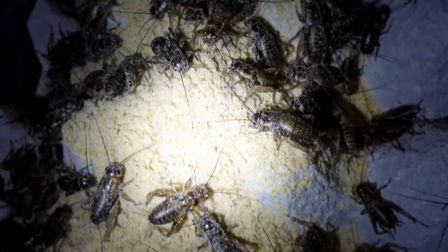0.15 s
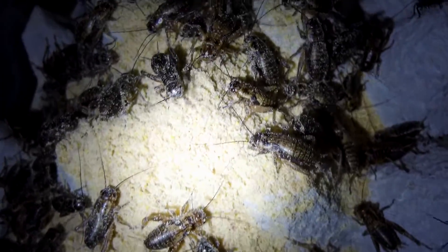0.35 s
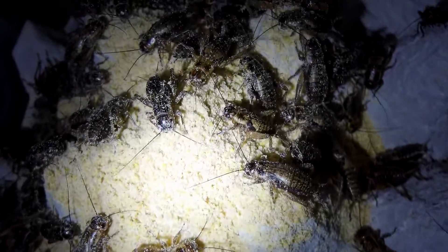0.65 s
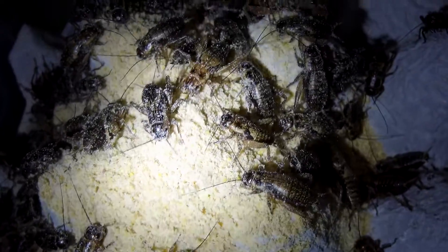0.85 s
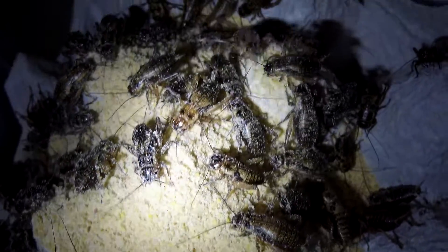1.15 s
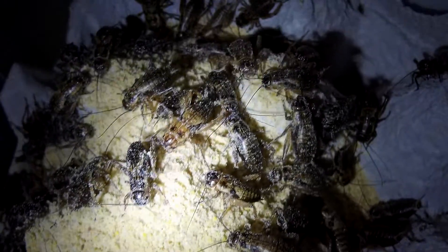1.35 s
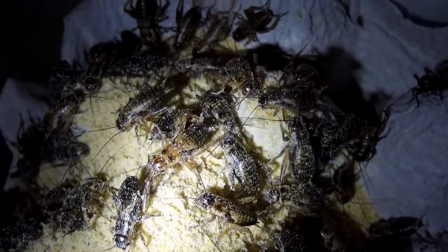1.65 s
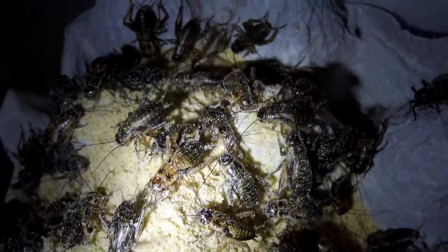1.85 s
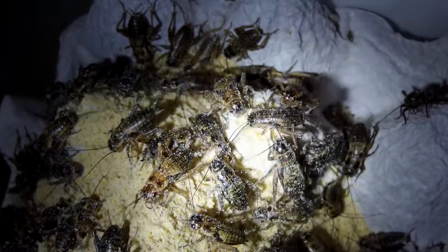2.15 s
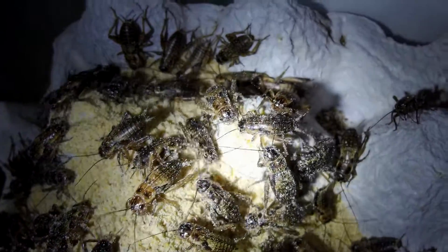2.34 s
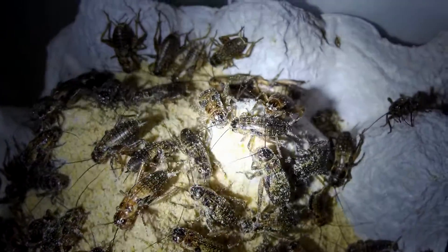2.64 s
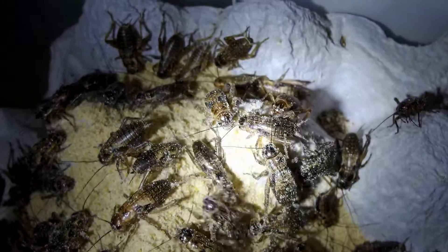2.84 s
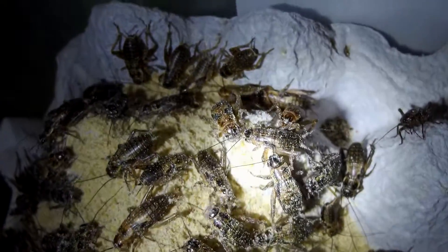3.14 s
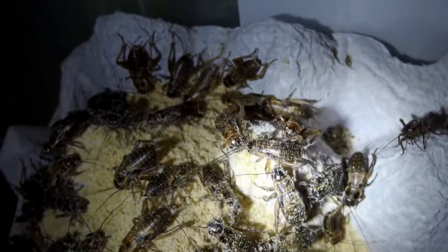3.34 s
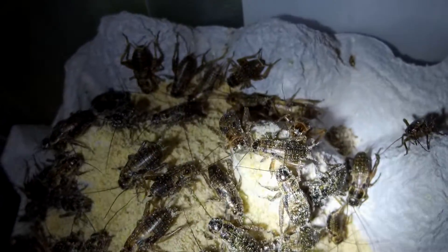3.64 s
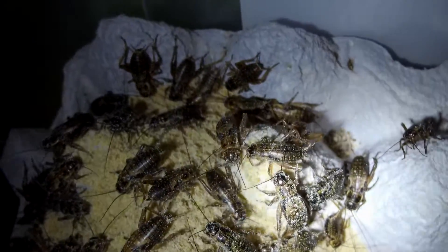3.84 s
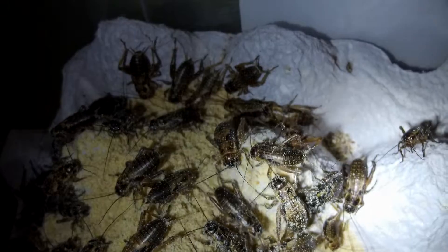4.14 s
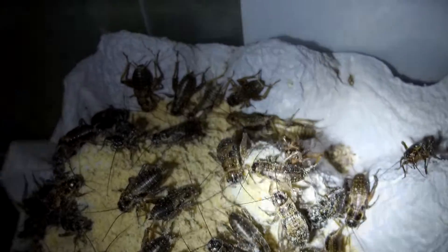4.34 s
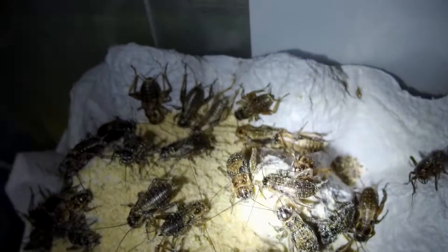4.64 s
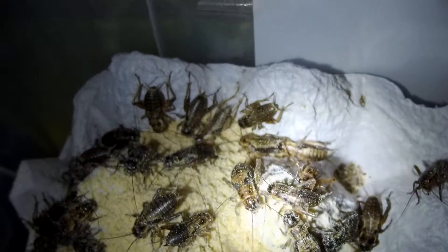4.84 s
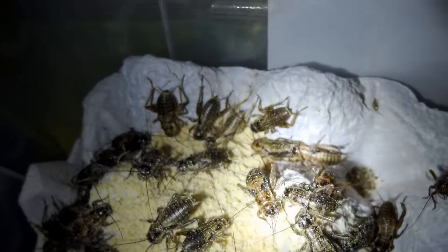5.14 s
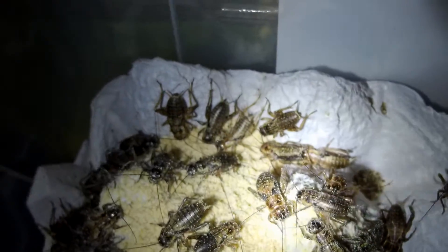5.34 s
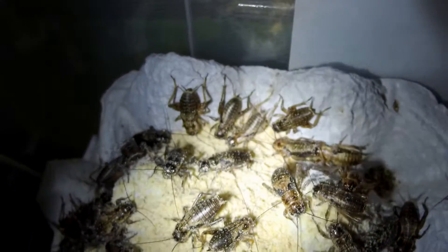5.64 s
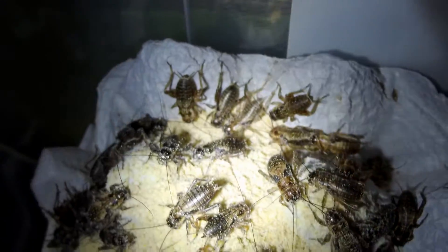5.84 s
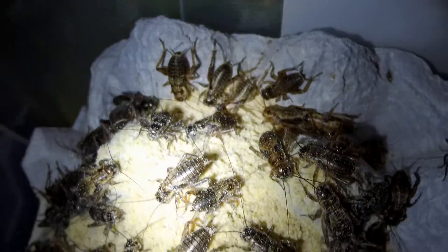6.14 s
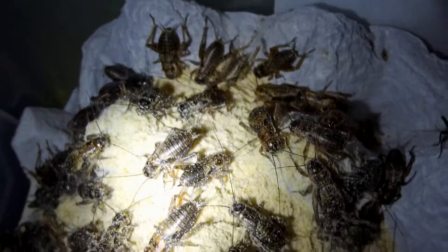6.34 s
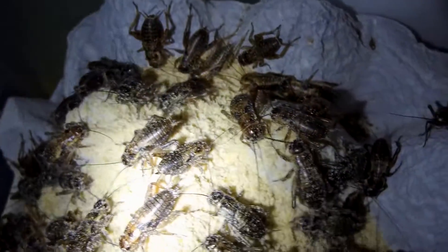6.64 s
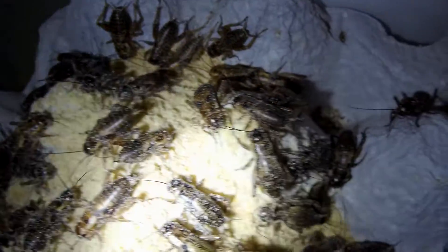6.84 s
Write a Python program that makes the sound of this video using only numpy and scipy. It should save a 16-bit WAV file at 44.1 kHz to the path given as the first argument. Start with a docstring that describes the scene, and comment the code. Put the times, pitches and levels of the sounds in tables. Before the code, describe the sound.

Dry, tiny ticks and scuffles of crawling, feeding crickets over a low steady hum, with one hollow knock and finger handling noise up close.

```python
"""Indoors, beside a tub: crickets crawl and feed on crumbs a hand's breadth from a hand-held camera.
Legs and jaws tick and scuffle as shaped noise bursts; mains hum, whine and a whistle are sines;
room air and microphone hiss are coloured noise. Something hollow is knocked once (struck modes),
and fingers shake the microphone, tap the casing (noise bursts) and rub it (stick-slip pulses)."""
import sys
import numpy as np
from scipy import signal
from scipy.fft import rfft, irfft
from scipy.io import wavfile
from scipy.ndimage import uniform_filter1d

SR = 44100
rng = np.random.default_rng(int(sys.argv[2]) if len(sys.argv) > 2 else 0)


def transcribe(u):
    """Save the signal u as a 16-bit wav file named by the first command-line argument.

    u: samples, shape (n,) or (channels, n), limited to [-1, 1]; the rate is SR.
    q: integer samples, one column per channel.
    """
    v = np.clip(np.atleast_2d(u).T, -1, 1)
    q = np.round(v * 32767).astype(np.int16)
    wavfile.write(sys.argv[1], SR, q)


N = 308259
T = np.arange(N) / SR

# mains hum: (frequency [Hz], mean level [dB rms])
HUM = [(120, -44.5), (240, -59.5)]
# electric whine with mains sidebands: (frequency [Hz], mean level [dB rms])
WHINE = [(12168, -83), (12228, -77), (12288, -83)]
# colour of room air and hiss: (frequency [Hz], relative density [dB per Hz])
AIR_COLOUR = [(35, -28), (60, -15), (98, -10), (123, -3), (145, -5.5), (170, -5), (241, -7.5), (311, -12.5),
              (410, -16.5), (580, -21), (966, -24), (1220, -26.5), (6450, -35.5), (12100, -33),
              (15200, -37.5)]
# resonances of the air: (centre [Hz], width [Hz], level [dB rms])
AIR_RESONANCES = [(81.6, 18, -59), (146.2, 8.1, -62), (239, 50, -57), (600, 156, -58)]
# rumble as the hand shakes the microphone: (time [s], level before jolts [dB rms])
SHAKE = [(0.0, -67), (0.6, -53), (0.8, -61), (2.14, -61), (2.22, -49), (2.32, -61), (3.19, -57),
         (3.27, -48), (3.36, -56), (3.43, -44.5), (3.54, -43), (3.62, -58), (4.7, -53), (5.14, -46.5),
         (5.28, -55), (5.64, -52), (5.71, -45), (6.15, -62), (6.44, -50), (6.6, -61), (6.99, -58)]
# bodies scuffling over crumbs: (time [s], length [s], level [dB rms], centre [Hz], width [Hz])
SCUFFLES = [(0, 0.098, -58.5, 9400, 11000), (0.302, 0.021, -60, 4000, 2500),
            (0.339, 0.053, -60, 9000, 9000), (0.534, .03, -63, 7000, 8050), (0.655, 0.031, -53, 5900, 9000),
            (1.885, .05, -61, 10000, 8000), (2.868, 0.036, -57, 9000, 9000),
            (3.09, 0.17, -65.5, 3900, 1800), (3.794, 0.17, -65.5, 4000, 4000),
            (5.797, 0.048, -49.5, 2380, 4140), (6.027, .1, -66, 4800, 1600),
            (6.549, 0.088, -56.5, 7850, 9000), (6.836, 0.21, -63, 12200, 5000)]
# fainter feet: (centre [Hz], mean rate [steps/s], level [dB rms])
PATTER = [(3360.0, 31, -68.5), (6160.0, 81, -71), (11900.0, 60, -64)]
# short faint rising pips, perhaps a far cricket: (time [s], level [dB], mid pitch [Hz])
PIPS = [(0.174, -54, 2430), (.783, -56, 2570), (1.267, -51, 2580), (3.73, -54.5, 2700), (4.228, -60, 2620),
        (6.202, -58, 2640), (6.713, -55.5, 2690)]
# clearest ticks of legs and jaws: (time [s], peak level [dB], centre [Hz])
TICKS = [(0.178, -42, 4530), (0.431, -44, 4000), (0.5936, -35, 13700), (0.622, -44, 4590),
         (0.658, -42, 4730), (0.706, -39, 12200), (0.813, -38, 11500), (0.839, -43, 4620),
         (0.9468, -35, 11600), (0.9957, -38, 12900), (1.073, -41, 11100), (1.107, -29, 14000),
         (1.238, -35.5, 12300), (1.4003, -37, 12000), (1.485, -43, 5020), (1.6497, -33.5, 12200),
         (1.69, -35, 10000), (2.113, -32, 14000), (2.1642, -39, 5800), (2.2568, -36.5, 7340),
         (2.399, -38.5, 3770), (2.4868, -44, 4670), (2.543, -32.5, 11000), (2.562, -36, 3780),
         (2.589, -30, 13300), (2.881, -32.5, 8800), (3.02, -40, 11600), (3.0505, -35, 14100),
         (3.2947, -30.5, 3900), (3.2955, -33, 9500), (3.4466, -40, 14600), (3.616, -34.5, 11900),
         (3.7484, -42, 8980), (3.8352, -37, 13200), (4.143, -41, 5590), (4.2199, -35, 12200),
         (4.3248, -42, 4600), (4.325, -38, 11100), (4.4435, -33, 11400), (4.61, -35, 13300),
         (4.78, -37, 11800), (4.897, -35, 13700), (4.9668, -33.5, 10300), (5.2281, -41, 12800),
         (5.5426, -35, 12200), (5.6925, -41, 12100), (5.751, -34, 12200), (5.7983, -32, 3240),
         (5.863, -43, 5500), (6.01, -47, 3200), (6.1629, -38.5, 4500), (6.1824, -36, 11000),
         (6.4937, -36, 13400), (6.5511, -40, 11500), (6.69, -38, 14000), (6.799, -32, 12100),
         (6.8349, -41, 6480), (6.8863, -31.5, 11900)]
# blows on the hollow thing: (time [s], strength [dB], contact [s], place [0 rim to 1 middle])
KNOCKS = [(.304, -18.5, 0.00051, .05), (.308, -33, 0.00068, .05), (.316, -18.5, 0.00033, 1),
          (0.329, -29, 0.0004, 0.5)]
# its modes: (frequency [Hz], level struck at rim [dB], level struck in middle [dB], t60 [s])
HOLLOW_MODES = [(139.2, -15, -7.5, 0.25), (309, -2, -9, 0.12), (497, -14, -33, 0.05), (626, -15, 0, 0.12),
                (641, -14, -2.5, 0.21), (880, -19, -25, 0.081), (1107, -8.5, -16, 0.078),
                (1292, -9, -25, 0.086), (1875, -27, -22, 0.1), (2308, -14, -25, 0.11),
                (2970, -28, -24.5, .07)]
# the room's answer to a blow: (centre [Hz], width [Hz], relative level [dB], t60 [s])
ECHO = [(194, 230, -12.5, 0.28), (627, 250, -15.5, 0.26), (1150, 450, -22.5, 0.23), (2270, 800, -27, 0.17),
        (3900, 2200, -42, 0.071)]
# taps on the casing: (time [s], peak level before last band-pass [dB], centre [Hz], t60 [s])
TAPS = [(0.475, -30.5, 1090, 0.024), (0.52, -41, 600, .03), (0.563, -35, 595, 0.041),
        (2.167, -41.5, 900, 0.026), (2.446, -37, 460, 0.048), (2.603, -39, 1800, 0.012),
        (3.294, -43, 890, 0.033), (3.812, -40, 1280, 0.05), (4.037, -37.5, 1300, 0.017),
        (4.042, -21, 770, 0.015), (4.136, -35, 1480, 0.025), (4.143, -26, 700, 0.042),
        (4.192, -40.5, 860, 0.064), (4.325, -32.5, 1080, 0.021), (4.513, -34, 590, 0.015),
        (5.382, -43, 1160, 0.076), (5.669, -30.5, 590, 0.034), (5.797, -30.5, 1310, 0.036),
        (5.802, -31.5, 694, 0.082), (5.818, -43.5, 2300, 0.12), (6.377, -38, 690, 0.039)]
# finger strokes along the casing: (start [s], rise [s], hold [s], level [dB])
RUBS = [(3.77, 0.027, 0.019, -48.5), (3.89, .03, 0.099, -54), (4.162, .02, 0.033, -51),
        (4.484, .04, 0.037, -45), (5.183, 0.032, .055, -55), (5.906, 0.025, .025, -47.5),
        (6.015, 0.038, 0.021, -39.5), (6.094, .005, 0.027, -39.5), (6.145, 0.023, 0.019, -48),
        (6.839, .003, 0.041, -32.5), (6.891, 0.0033, 0.044, -31.5)]
# casing resonances: (centre [Hz], width [Hz], relative level [dB])
CASING = [(429, 255, 2.5), (593, 270, -10), (270, 105, -16), (1170, 370, -13.5)]

AIR_DB = -48
WHISTLE_HZ, WHISTLE_SAG_HZ_PER_S = 14050., 70.
WHISTLE_FAINT_DB, WHISTLE_SWOLLEN_DB = -80, -70  # per strand, before wavering
WHISTLE_SWELLS_S, WHISTLE_RISE_S = 4.4, .45
SHAKE_JOLT_DB = 2.5
GRIT_DB = 4.5  # spread of grain sizes in a scuffle
STEP_DECAY_S = 0.0047  # to 1/e
PIP_S, PIP_RISE_PER_S = .035, 2.4  # rise as share of mid pitch
TICK_T60_S = 0.011
TICK_WIDTH_HZ, TICK_WIDTH_SHARE = 3200, 0.51  # width = first + share of centre
TAP_RISE_SHARE = 0.095  # of t60
TAP_SHARP_CYCLES = 18  # cycles in t60 at which width = centre; longer rings are narrower
TAP_SNAP = 2  # first clean contact against the noise that follows
SLIP_HZ = 131.2  # typical stick-slip rate of skin on plastic
RUB_RELEASE_S = .014
TOP_HZ = 15230


def undb(db):
    """Amplitude from dB."""
    return 10 ** (np.asarray(db) / 20)


def level(x, rms_db):
    """Scales x to an rms level."""
    return x * undb(rms_db) / np.sqrt(np.mean(x ** 2))


def noise(count=N):
    """White noise of unit spread."""
    return rng.standard_normal(count)


def band(x, hz, width_hz):
    """Two-pole-pair band-pass around hz."""
    low_hz = np.sqrt(hz ** 2 + width_hz ** 2 / 4) - width_hz / 2
    high_hz = min(low_hz + width_hz, .45 * SR)
    sos = signal.butter(2, [low_hz, high_hz], "bandpass", fs=SR, output="sos")
    return signal.sosfilt(sos, x)


def walk(rate_hz):
    """Random levels held 1 / rate_hz and slewed twice; spread near 1."""
    hold = int(SR / rate_hz)
    steps = np.repeat(noise(N // hold + 1), hold)
    slewed = uniform_filter1d(uniform_filter1d(steps, hold), hold)
    return 0.69 * slewed[:N]


def add(out, time_s, x):
    """Mixes x into out from time_s."""
    start = int(time_s * SR)
    out[start:start + len(x)] += x[:N - start]


def burst(peak_db, hz, width_hz, t60_s, rise_s=0.0002, linger_db=-20, snap=0.):
    """Noise coloured round hz: quick rise, optional contact spike, fall in t60, faint longer tail."""
    t = T[:4096]
    fall = 1000. ** (-t / max(t60_s, .001)) + undb(linger_db) * 1000. ** (-t / 0.066)
    spike = np.arange(len(t)) == int(rise_s * SR)
    shove = noise(len(t)) - snap * np.sqrt(SR / hz) * spike
    rise = np.minimum(t / max(rise_s, 1e-4), 1)
    x = band(shove * rise * fall, hz, width_hz)
    return x * undb(peak_db) / np.abs(x).max()


def hum_and_whine():
    """Steady sines at random phase, each wavering by about 1 dB."""
    out = np.zeros(N)
    for hz, db in [*HUM, *WHINE]:
        sine = np.sin(2 * np.pi * (hz * T + rng.random()))
        out += np.sqrt(2) * undb(db + 1.0 * walk(8)) * sine
    return out


def air():
    """Coloured noise that swells a little in each half octave, plus noise in the air's resonances."""
    hz, db = np.transpose(AIR_COLOUR)
    f = np.maximum(np.arange(N // 2 + 1) * SR / N, 1)
    colour = undb(np.interp(np.log(f), np.log(hz), db, -80, db[-2]))
    out, swell = np.zeros(N), walk(2.0)
    for centre in np.arange(6, 14.6, .5):  # log2 Hz
        window = np.cos(np.pi * np.clip(np.log2(f) - centre, -.5, .5))
        slice_noise = irfft(rfft(noise()) * colour * window, N)
        out += undb(0.12 * swell + 2.14 * walk(12)) * slice_noise
    out = level(out, AIR_DB)
    for centre_hz, width_hz, rms_db in AIR_RESONANCES:
        out += level(band(noise(), centre_hz, width_hz), rms_db)
    return out


def whistle():
    """Hazy high whistle, faint then swelling and sagging: strands wander apart and blur into a band."""
    out = np.zeros(N)
    swell_s = [WHISTLE_SWELLS_S, WHISTLE_SWELLS_S + WHISTLE_RISE_S]
    db = np.interp(T, swell_s, [WHISTLE_FAINT_DB, WHISTLE_SWOLLEN_DB])
    sag_hz = WHISTLE_SAG_HZ_PER_S * np.maximum(T - WHISTLE_SWELLS_S, 0)
    for shift_hz in (-280, -59, 130, 321):
        pitch_hz = WHISTLE_HZ - sag_hz + shift_hz + 110 * walk(8) + 70 * walk(400)
        out += undb(db + 5.1 * walk(12)) * np.sin(2 * np.pi * np.cumsum(pitch_hz) / SR)
    return out


def hand_shake():
    """Low noise rumble follows the shaking hand, with random jolts."""
    rumble = level(band(noise(), 48.0, 48.0), 0)
    shake_db = np.interp(T, *np.transpose(SHAKE))
    return rumble * undb(shake_db + SHAKE_JOLT_DB * walk(9))


def scuffles():
    """Band-passed noise grains of uneven size, quick to rise and slower to fade."""
    out = np.zeros(N)
    for time_s, length_s, db, hz, width_hz in SCUFFLES:
        ramp = np.arange(int(length_s * SR)) / (length_s * SR)
        grain_db = GRIT_DB * np.minimum(rng.exponential(size=SR // 4), 4)
        grit = band(undb(grain_db) * noise(SR // 4), hz, width_hz)[:len(ramp)]
        envelope = np.minimum(ramp / 0.059, 1) * (1 - ramp)
        add(out, time_s, level(grit * envelope, db))
    return out


def patter():
    """Fainter feet step at chance moments, each a decaying scrape of noise."""
    out = np.zeros(N)
    for hz, steps_per_s, db in PATTER:
        step_db = 3.5 * np.minimum(rng.exponential(size=N), 3)
        steps = (rng.random(N) < steps_per_s / SR) * undb(step_db)
        decay = signal.lfilter([1], [1, -np.exp(-1 / (STEP_DECAY_S * SR))], steps)
        out += level(band(decay * noise(), hz, hz * 0.98), db)
    return out


def pips():
    """Rising sine chirps under a smooth hump, with noisy flutter in level."""
    out = np.zeros(N)
    t = T[:int(PIP_S * SR)]
    for time_s, db, hz in PIPS:
        flutter = 1 + level(band(noise(len(t)), 120., 200.), -8.5)
        pitch_hz = hz * (1 + PIP_RISE_PER_S * (t - t.mean()))
        chirp = np.sin(2 * np.pi * np.cumsum(pitch_hz) / SR)
        add(out, time_s, undb(db) * np.hanning(len(t)) * flutter * chirp)
    return out


def ticks():
    """Legs and jaws click as short broad noise bursts, with a faint longer tail from the tub walls."""
    out = np.zeros(N)
    for time_s, db, hz in TICKS:
        width_hz = TICK_WIDTH_HZ + TICK_WIDTH_SHARE * hz
        add(out, time_s, burst(db, hz, width_hz, TICK_T60_S))
    return out


def knock():
    """Smooth pushes ring the modes by where each blow lands; the room answers with a dense tail."""
    out, t = np.zeros(N), T[:SR // 2]
    for time_s, strength_db, contact_s, place in KNOCKS:
        push = np.hanning(int(contact_s * SR) + 3)
        ring, tail = np.zeros(len(t)), np.zeros(len(t))
        for hz, rim_db, middle_db, t60_s in HOLLOW_MODES:
            mode_db = rim_db + place * (middle_db - rim_db)
            ring += undb(mode_db) * np.sin(2 * np.pi * hz * t) * 1000. ** (-t / t60_s)
        for hz, width_hz, db, t60_s in ECHO:
            tail += level(band(noise(len(t)), hz, width_hz), db) * 1000. ** (-t / t60_s)
        struck = np.convolve(ring, push / push.sum())[:len(t)]
        add(out, time_s, undb(strength_db) * (struck + tail * np.minimum(t / 0.0015, 1)))
    return band(out, 840.0, 6500.0)


def taps():
    """Fingertips hit the casing: a clean contact within a noise burst, narrower the longer it rings."""
    out = np.zeros(N)
    for time_s, db, hz, t60_s in TAPS:
        width_hz = hz * np.sqrt(TAP_SHARP_CYCLES / (hz * t60_s))
        tap = burst(db, hz, width_hz, t60_s, TAP_RISE_SHARE * t60_s, snap=TAP_SNAP)
        add(out, time_s, band(tap, hz, 1.17 * width_hz))
    return out


def rubs():
    """Skin sticks and slips at uneven gaps; the slips sound through the casing's resonances."""
    count = int(2 * SLIP_HZ * N / SR)
    gaps_s = np.exp(.35 * noise(count)) / SLIP_HZ
    slip_at = (np.cumsum(gaps_s) * SR).astype(int)
    slip_size = undb(2.8 * noise(count))
    slips = 0.043 * noise()
    slips[slip_at[slip_at < N]] += slip_size[slip_at < N]
    # a soft fingertip lets go over a few tenths of a millisecond
    soft = np.convolve(slips, np.hanning(int(0.00082 * SR)), "same")
    rub = level(sum(level(band(soft, hz, width_hz), db) for hz, width_hz, db in CASING), 0)
    # the treble is only a grainy hiss
    rub += level(band(noise() * undb(2.4 * walk(100)), 4900.0, 1600.), -27)
    strokes = np.zeros(N)
    for start_s, rise_s, hold_s, db in RUBS:
        corners_s = start_s + np.cumsum([0, rise_s, hold_s, RUB_RELEASE_S])
        strokes += undb(db) * np.interp(T, corners_s, [0, 1, 1, 0])
    return rub * strokes


def scene():
    """Sums room, crickets, knock and fingers into one channel."""
    room = hum_and_whine() + air() + whistle()
    crickets = scuffles() + patter() + pips() + ticks()
    fingers = hand_shake() + taps() + rubs()
    return (room + crickets + knock() + fingers)[None]


def record(dry):
    """The camera cuts the top with a steep low-pass."""
    return signal.sosfilt(signal.ellip(10, .2, 60, TOP_HZ, fs=SR, output="sos"), dry)


dry = scene()
out = record(dry)
transcribe(out)
```